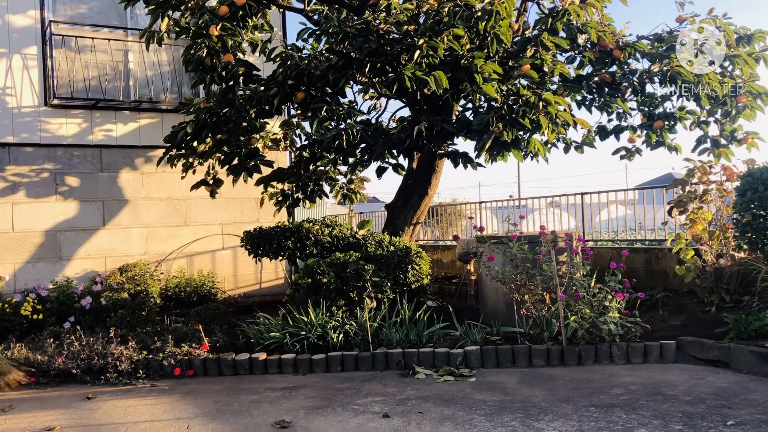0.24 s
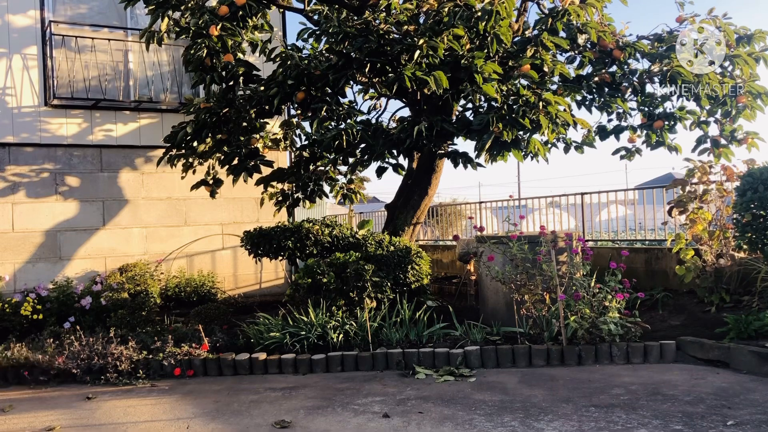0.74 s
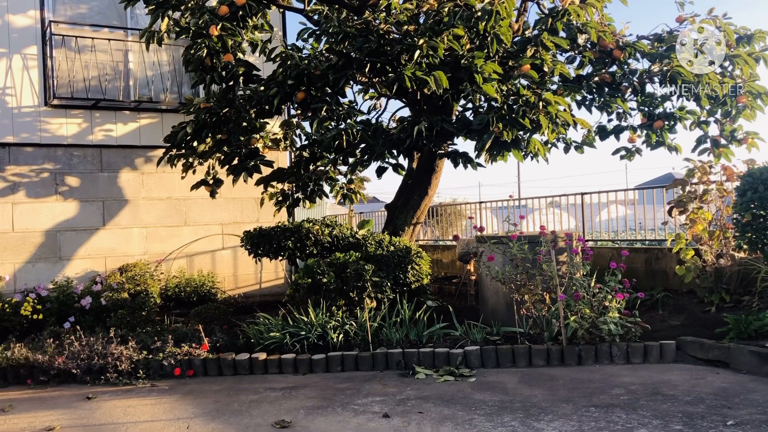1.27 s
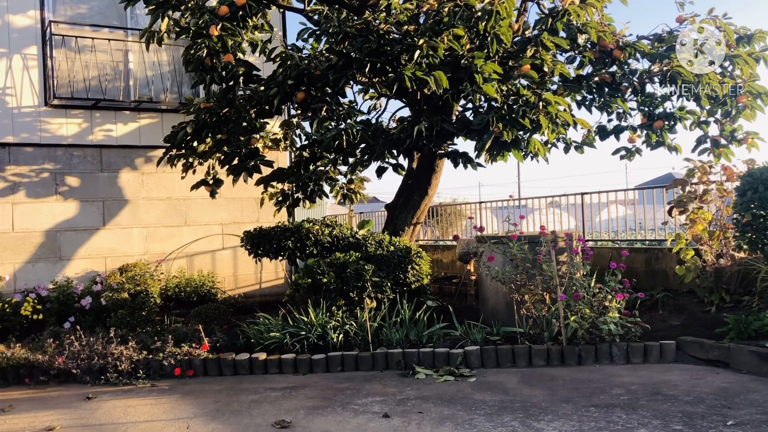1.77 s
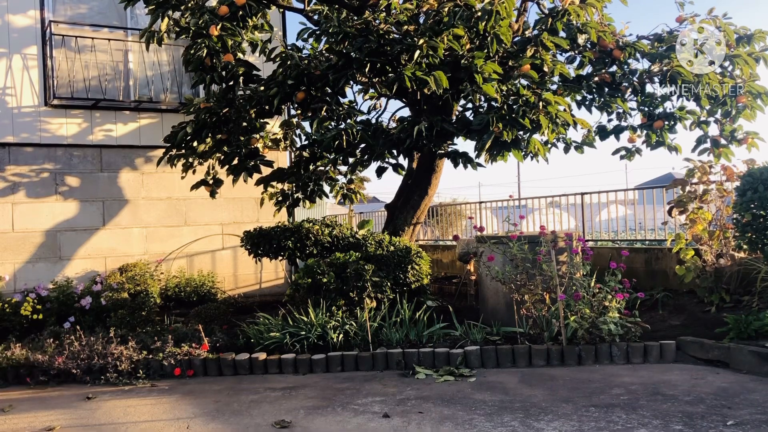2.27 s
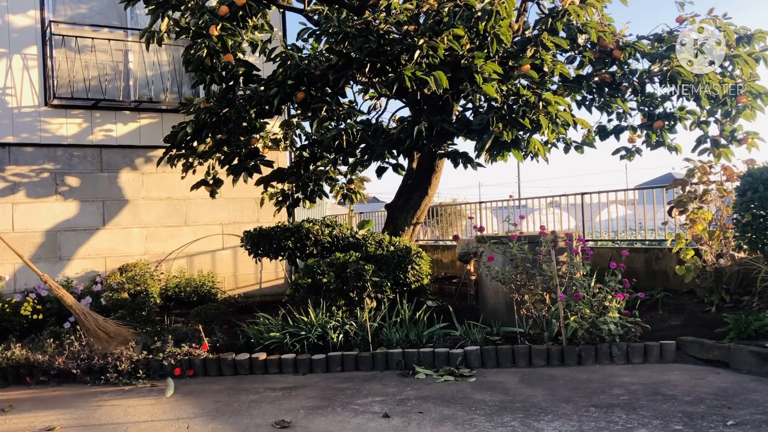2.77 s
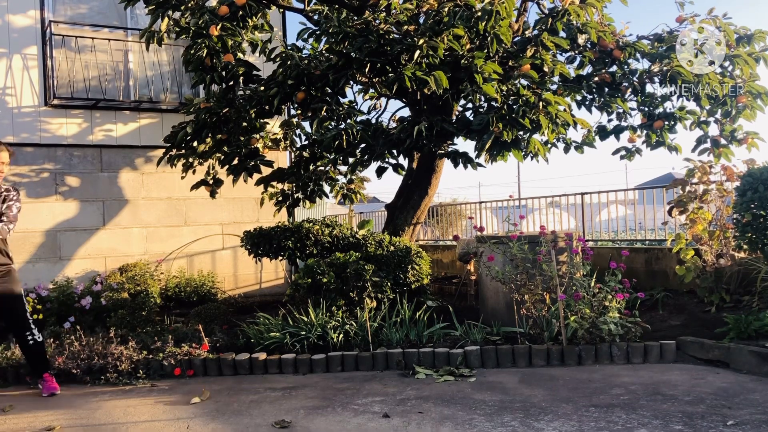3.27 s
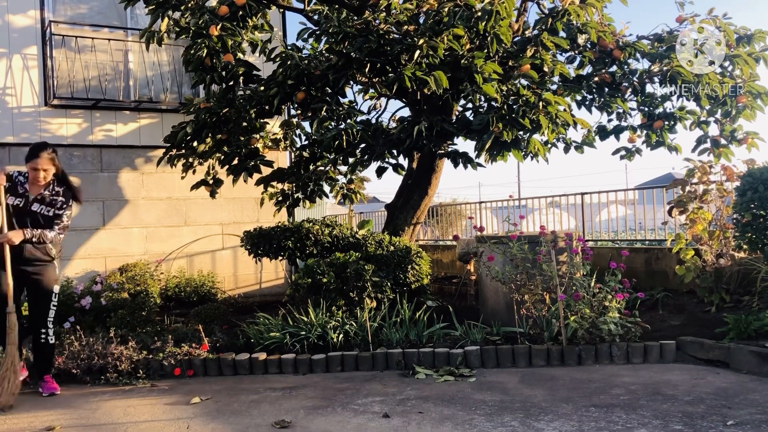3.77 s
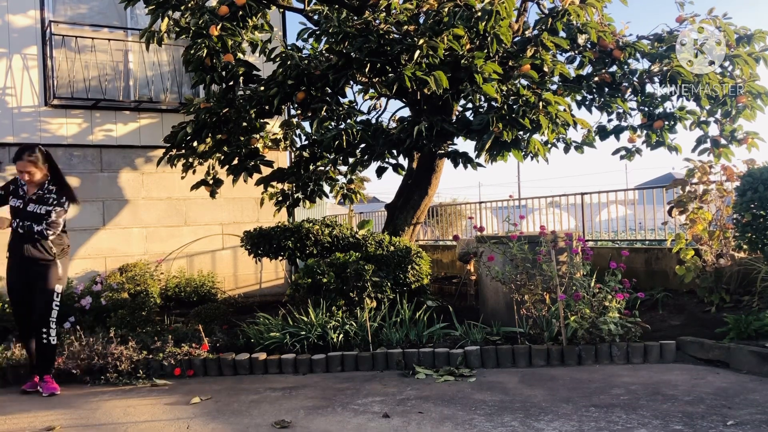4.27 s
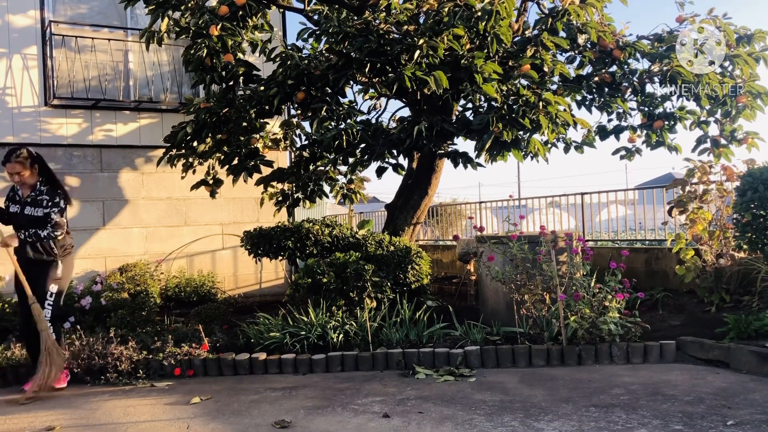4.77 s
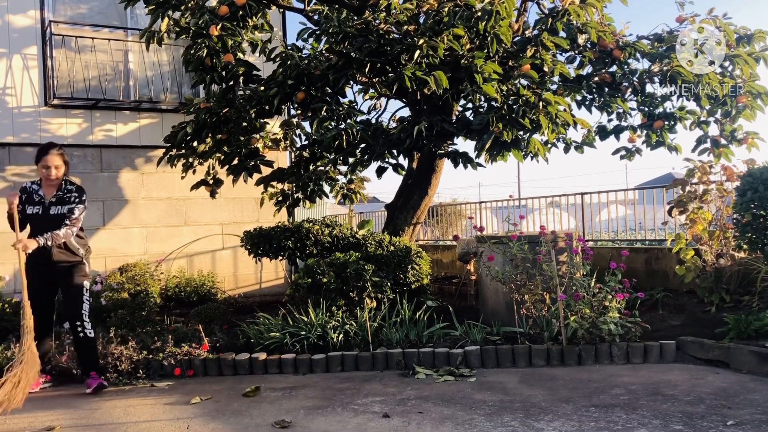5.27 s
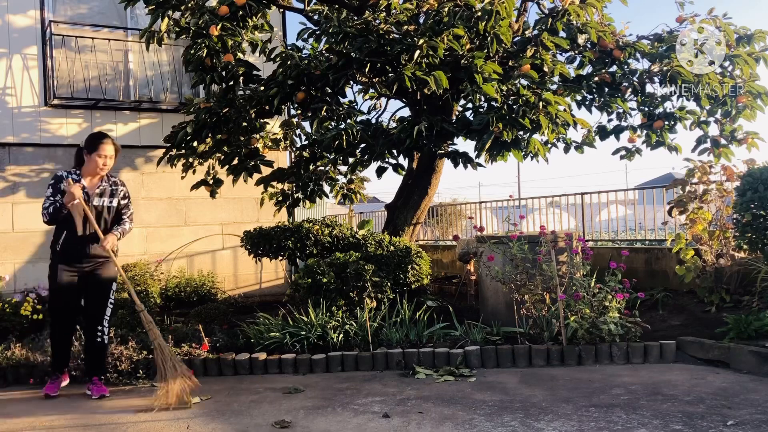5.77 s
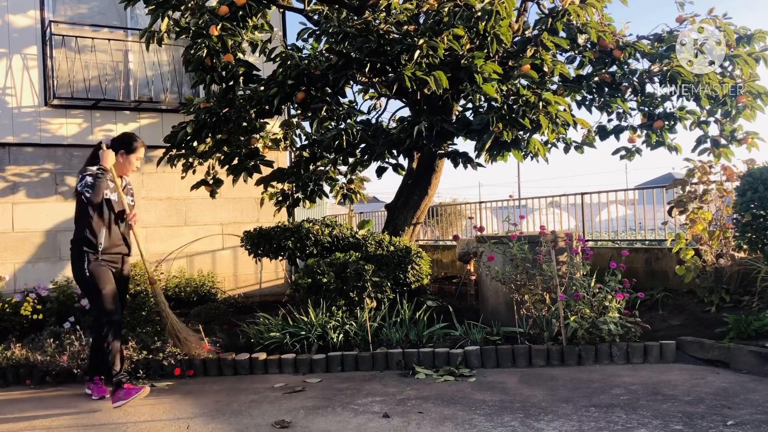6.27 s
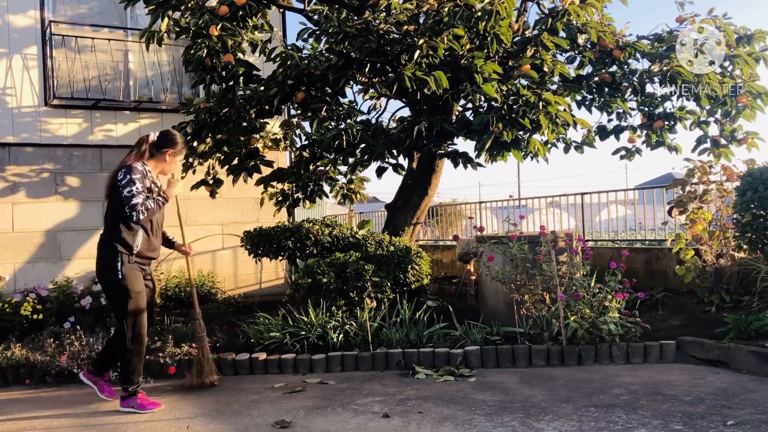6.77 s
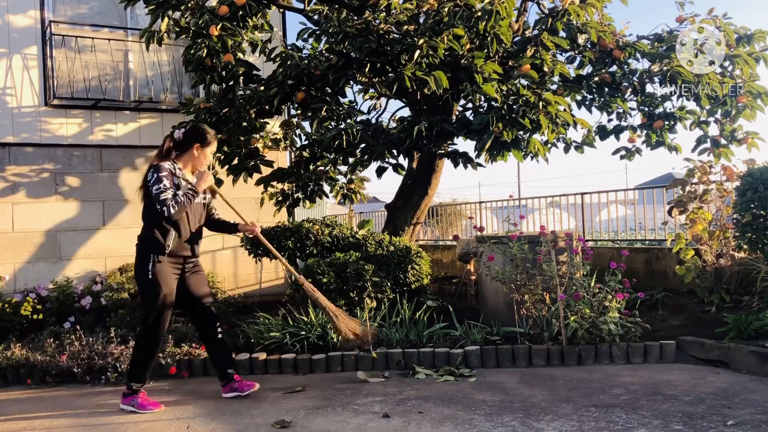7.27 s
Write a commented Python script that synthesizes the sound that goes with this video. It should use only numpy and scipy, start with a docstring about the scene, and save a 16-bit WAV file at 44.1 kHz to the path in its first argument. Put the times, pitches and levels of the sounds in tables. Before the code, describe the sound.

A twig broom sweeps a concrete patio in unhurried, bright hissing strokes, with gritty scuffs and skittering litter over low distant engine hum.

```python
"""A twig-broom stroke at its loudest opens the scene, the first of seven easy strokes on a concrete patio.
Stick-slip impulses make the broom's hiss, scrape and rasp; resonances add the ring of tips, twigs and stalks.
Shoes scuff with bursts of grains, litter skitters in ticks, stalks snap and the slab knocks as decaying modes.
A far bird calls in gliding sines over coloured noise, a drone and a wavering engine hum.
Echoes are a short noise scatter. The mono mix goes to two equal channels."""
import sys
import numpy as np
from scipy import signal
from scipy.fft import rfft, irfft
from scipy.io import wavfile

SR = 44100
rng = np.random.default_rng(int(sys.argv[2]) if len(sys.argv) > 2 else 0)


def generate_wav(sig):
    """Save sig (samples, or channels by samples) to the path in sys.argv[1] as 16-bit PCM at SR."""
    pcm = np.round(np.clip(np.atleast_2d(sig).T, -1, 1) * 32767).astype(np.int16)
    wavfile.write(sys.argv[1], SR, pcm)


N = 332073  # samples

# Pushes of the arms, one to three to a stroke. Each row: landing in seconds, swell in seconds, ease in seconds,
# landing level in dB below the peak, peak hiss of the tips in dB, scrape of the twigs in dB re hiss,
# rasp of the stalks in dB re hiss, tip ring in dB re hiss (before its drop at light pressure),
# loaded-twig ring in dB re hiss, mean twig-ring pitch in Hz, mean tip-ring pitch in Hz.
ARM_PUSHES = [(-0.2, 0.23, 0.14, 31, -24, -10, -17.5, -4, -27.5, 4800, 11300),
              (0.872, 0.115, 0.044, 18.5, -29, -14, -33, -4.5, -27.5, 3870, 10400),
              (0.92, 0.13, 0.091, 20, -31, -10, -12, -4, -9.5, 4300, 10700),
              (1.05, 0.21, 0.09, 24, -25.5, -10, -16, -4.5, -20.5, 4520, 11700),
              (2.092, 0.076, 0.045, 25, -32, -18, -32, -2.5, -28, 3957, 11050),
              (2.125, 0.18, 0.065, 25.5, -28, -6, -13, -6, -11.5, 3306, 11300),
              (2.212, 0.24, 0.097, 36.5, -22.5, -10, -20, -7, -30, 4980, 11400),
              (3.2, 0.15, 0.15, 15, -38, -5.5, -12, -4.5, -8.5, 4100, 10940),
              (3.499, 0.32, 0.055, 25.5, -27, -7.5, -17.5, -10.5, -19, 4900, 11670),
              (4.527, 0.22, 0.062, 22.5, -23.5, -8, -16.5, -9, -18.5, 2670, 11700),
              (5.287, 0.26, 0.28, 36, -24.5, -7.5, -15.5, -10.5, -24.5, 5130, 11750),
              (6.519, 0.11, 0.13, 19.5, -25, -9, -18.5, -26, -20.5, 3324, 11600),
              (6.6, 0.23, 0.12, 29.5, -23, -9, -18.5, -27, -17.5, 3400, 11600),
              (6.915, 0.087, 0.063, 32, -28, -7, -15, -26.5, -30, 5250, 11600)]
# Spectrum of the tips' hiss. Each row: frequency in Hz, relative density in dB per Hz.
TIP_SPECTRUM = [(5000, -20), (7000, -12.5), (8300, -7.5), (10000, -1.5), (12000, -2.5), (13200, 0.5),
                (15500, 2)]
# Spectrum of the twigs' scrape. Each row: frequency in Hz, relative density in dB per Hz.
TWIG_SPECTRUM = [(2000, -4), (3500, -2), (5000, 5), (7500, 0), (9500, -11.5)]
# Spectrum of the stalks' rasp. Each row: frequency in Hz, relative density in dB per Hz.
STALK_SPECTRUM = [(200, -22), (400, -6), (800, -5), (1400, -2.5), (4500, 0)]
# Thick stalks catch and spring free. Each row: time in seconds, level in dB, pitch as a multiple of the modes.
STALK_SNAPS = [(3.346, -38.5, .68), (3.776, -32.5, 1.05), (3.787, -34, .66), (4.663, -26.5, 1.15),
               (4.669, -25, 1.08), (4.751, -25, 1.075), (4.805, -28.5, 1.1), (5.987, -38.5, 1.08)]
# Modes of a stalk. Each row: frequency in Hz at pitch 1, level in dB re snap, T60 in seconds.
STALK_BODY_MODES = [(775, -12, 0.02), (1076, 2, 0.0031), (2020, 6, 0.0077), (2380, -3.5, 0.043),
                    (2420, -21, 0.58), (2800, -3.5, 0.028), (3830, 4.5, 0.012), (4900, -3, 0.012)]
# Shoe scuffs and light broom touches. Each row: start in seconds, level in dB before the band gains,
# treble in dB re middle before the band gains, T60 in seconds.
SCUFF_BURSTS = [(0.41, -34.5, 4, 0.015), (0.584, -42.5, 4, 0.14), (0.595, -38, 0, 0.12),
                (2.744, -33, 3, 0.1), (3.081, -43.5, -3, 0.19), (3.138, -41.5, 9, 0.059),
                (3.158, -47, 8, 0.096), (4.135, -34, -11, 0.038), (4.286, -46.5, -15, 0.13),
                (5.153, -40.5, 2, 0.17), (5.957, -34.5, -28, 0.094), (5.985, -29.5, -5.5, 0.052),
                (6.098, -26.5, -1, 0.045), (6.118, -37, -3, 0.15), (6.332, -34, -3, 0.13),
                (6.433, -39.5, -15, 0.11), (7.205, -38, -10, 0.083), (7.246, -38.5, -3, 0.15),
                (7.344, -42, -16, 0.026), (7.393, -37, -13, 0.019)]
# Litter and grit on the move. Each row: start in seconds, length in seconds, peak level in dB,
# treble in dB re middle.
LITTER_RUNS = [(0.405, 0.15, -61, -0.5), (0.803, 0.11, -54.5, 4), (1.648, 0.39, -71, 8.5),
               (4.039, 0.52, -61.5, -21), (5.208, 0.093, -53, -11), (5.93, 1, -58.5, -16),
               (6.322, 0.3, -62, 6.5), (7.053, 0.5, -48, -10)]
# Spectrum of the litter's middle. Each row: frequency in Hz, relative density in dB per Hz.
LITTER_SPECTRUM = [(1200, 3), (3300, 5.5), (5500, 1), (7000, -4.5), (9500, -13.5)]
# Dull blows of shoes and broom head on the slab. Each row: time in seconds, level in dB,
# pitch as a multiple of the modes.
SLAB_KNOCKS = [(.2528, -31.5, 1), (.276, -36.5, .48), (1.594, -41, .72), (1.606, -39, .55),
               (3.778, -38.5, .9), (7.345, -41, 1.05)]
# Modes of the knocks. Each row: frequency in Hz at pitch 1, level in dB re knock, T60 in seconds.
SLAB_MODES = [(220, 0, 0.035), (512, 1, 0.026), (880, 4.5, 0.02), (1380, 9, 0.0064)]
# Bird notes. Each row: start in seconds, length in seconds, first pitch in Hz, last pitch in Hz,
# mid-note arch in Hz, level in dB before flutter and echo.
BIRD_NOTES = [(0.355, .135, 3950, 4560, 0, -61.5), (0.645, 0.09, 3660, 3620, 150, -68),
              (4.365, 0.09, 3850, 3850, 350, -66)]
# Spectrum of the neighbourhood's rumble. Each row: frequency in Hz, relative density in dB per Hz.
AIR_SPECTRUM = [(28, -40), (38, -13.5), (48, 3.5), (68, -0.5), (95, 3.5), (200, -2.5), (400, -8.5),
                (900, -10), (1400, -14), (2200, -26), (4000, -30.5), (7000, -37.5), (15000, -40)]
# Far engine. Each row: time in seconds, firing note in dB rms before its swell, octave in dB rms before its swell.
ENGINE_LEVELS = [(0, -58.5, -71), (.9, -66, -55), (1.5, -61.5, -67), (5.2, -58.5, -69.5), (6.7, -52, -63.5),
                 (7.5, -55.5, -87)]

CONTROL_STEP_S = 0.002
EASE_DB = 6.5  # drop below the peak at lift-off
LAND_DB_PER_S, LIFT_DB_PER_S = 1485.5, 338
SETTLE_DB = -16.5  # level re peak from which the lifted bundle's rustle decays
TIPS_SETTLE_DB_PER_S, TWIGS_SETTLE_DB_PER_S = 102, 71.5
# floors: faint rustle and ring of the carried broom
CARRY_HISS_DB, CARRY_SCRAPE_DB, CARRY_RASP_DB, CARRY_RING_DB = -80, -82, -70, -85
SCRAPE_FOLLOW, RASP_FOLLOW, TWIG_RING_FOLLOW = 0.8, 0.67, 0.96  # share of the push's swing in dB
TIP_SWELL_DB, TWIG_SWELL_DB, STALK_SWELL_DB, SWELL_CORNER_HZ = 3, 5, 3, 3.6
RING_WANDER, RING_WANDER_CORNER_HZ = 0.025, 3  # fraction of pitch
TIP_WIDTH_HZ, TWIG_WIDTH_HZ = 1270, 880
CRACKS_PER_S, CRACK_DB = 28, -36  # tips flick hard off pebbles; level re tip sound
SCUFF_ATTACK_S, SCUFF_SCRAPS_DB = 0.00096, -6.5  # ringing scraps re grit
SCRAP_TICKS_PER_S, SCRAP_T60_S = 1500, 0.009
SAND_GRAINS_PER_S, SAND_SPREAD_DB, SKITTER_SAND_DB = 1500, 6, -0.5  # sand re scraps
BIRD_WAVER = 0.008  # fraction of pitch
AIR_DB = -48.5  # rms
HUM_HZ, HUM_WAVER, HUM_SWELL_DB = 144.5, 0.014, 2.8  # waver as a fraction of pitch
DRONE_HZ, DRONE_DB, DRONE_T60_S = 66.3, -56.5, 0.87  # dB rms
CUTOFF_HZ = 15850


def broom():
    """Tips hiss, twigs scrape, stalks rasp; a harder stroke brings more twigs into contact."""
    hiss_db, scrape_db, rasp_db, tip_db, twig_db, twig_hz, tip_hz = sweep()
    pressure = np.clip(from_db(hiss_db + 33), 0, 1)
    lightness = 1 - np.sqrt(pressure)
    slips_per_s = 1500 + 22000 * pressure
    contacts = slips(slips_per_s, spread_db=3)

    tips = coloured(contacts, TIP_SPECTRUM)
    tip_rings = twig_rings(slips_per_s, 7200, 15500, t60_s=0.0056, swell_db=TIP_SWELL_DB, count=20)
    tips = blend(tips, tip_rings, -8)
    tips = blend(tips, moving_ring(tip_hz, TIP_WIDTH_HZ), tip_db - 7 * lightness ** 2)
    cracks = rms_one(band(slips(CRACKS_PER_S, spread_db=20), 3000, 15000))
    tips = blend(tips, cracks, CRACK_DB)

    twigs = coloured(slips(slips_per_s, spread_db=5), TWIG_SPECTRUM)
    single_twigs = twig_rings(slips_per_s, 3100, 6600, t60_s=0.028, swell_db=TWIG_SWELL_DB, count=10)
    twigs = blend(twigs, single_twigs, -8.5)
    # barely touching, single grains of grit crackle
    crackle = rms_one(band(slips(240, spread_db=4.5), 2400, 5300))
    twigs = blend(twigs, crackle, -17 + 14 * lightness ** 2)
    loaded = moving_ring(twig_hz, TWIG_WIDTH_HZ)

    stalks = coloured(contacts, STALK_SPECTRUM)
    stalk_rings = twig_rings(slips_per_s, 1500, 2800, t60_s=0.016, swell_db=STALK_SWELL_DB, count=8)
    stalks = blend(stalks, stalk_rings, -8)

    # pressed down, the head runs evenly; barely touching, it stutters
    judder_db = (0.8 + 2 * lightness ** 2) * np.clip(drift(32), -2, 2)
    head = tips + from_db(scrape_db) * twigs + from_db(twig_db) * loaded + from_db(rasp_db) * stalks
    return from_db(judder_db) * from_db(hiss_db) * head


def sweep():
    """Pushes add in power: hiss in dB; scrape, rasp, tip and twig ring in dB re hiss; two ring pitches in Hz."""
    t = np.arange(0, N / SR, CONTROL_STEP_S)
    columns = np.transpose(ARM_PUSHES)[:, :, None]
    start_s, swell_s, ease_s, landing_db, db, scrape_db, rasp_db, tip_db, twig_db, twig_hz, tip_hz = columns
    on_tips = push(t - start_s, swell_s, ease_s, landing_db, TIPS_SETTLE_DB_PER_S)
    on_twigs = push(t - start_s, swell_s, ease_s, landing_db, TWIGS_SETTLE_DB_PER_S)
    hiss = power_sum(db + on_tips, CARRY_HISS_DB)
    scrape = power_sum(db + scrape_db + SCRAPE_FOLLOW * on_tips, CARRY_SCRAPE_DB)
    rasp = power_sum(db + rasp_db + RASP_FOLLOW * on_twigs, CARRY_RASP_DB)
    tip_ring = power_sum(db + tip_db + on_tips, CARRY_RING_DB)
    twig_ring = power_sum(db + twig_db + TWIG_RING_FOLLOW * on_twigs, CARRY_RING_DB)
    twig_pitch = shared_pitch(twig_hz, db + twig_db + on_twigs)
    tip_pitch = shared_pitch(tip_hz, db + tip_db + on_tips)
    relative = [scrape - hiss, rasp - hiss, tip_ring - hiss, twig_ring - hiss]
    return in_time(np.transpose([t, hiss, *relative, twig_pitch, tip_pitch]))


def push(t, swell_s, ease_s, landing_db, settle_db_per_s):
    """Level in dB re peak, t seconds after landing: the push swells, eases, lifts, and the bundle settles."""
    to_come = np.clip(1 - t / swell_s, 0, 1)
    eased = np.clip((t - swell_s) / ease_s, 0, 1)
    lifted_s = np.maximum(t - swell_s - ease_s, 0)
    release = np.maximum(-LIFT_DB_PER_S * lifted_s, SETTLE_DB - settle_db_per_s * lifted_s)
    landing = LAND_DB_PER_S * np.minimum(t, 0)
    return landing - landing_db * to_come ** 2 - EASE_DB * eased ** 2 + release


def shared_pitch(hz, levels_db):
    """Power-weighted mean pitch: it glides from push to push as the load passes over."""
    power = from_db(levels_db - levels_db.max(axis=0)) ** 2
    return np.sum(hz * power, axis=0) / np.sum(power, axis=0)


def twig_rings(per_s, low_hz, high_hz, t60_s, swell_db, count):
    """Single twigs touch down and lift off; each slip rings one, and its pitch wanders as it bends; rms 1."""
    clicks = slips(per_s, spread_db=0)
    dealt = rng.integers(0, count, N)
    decay = from_db(-60 / (t60_s * SR))
    out = np.zeros(N)
    for k, hz in enumerate(np.geomspace(low_hz, high_hz, count)):
        swing = signal.lfilter([1], [1, -decay], clicks * (dealt == k) + 1e-18)
        wander = 2 * RING_WANDER * drift(RING_WANDER_CORNER_HZ / 2)
        phase = 2 * np.pi * np.cumsum(hz * (1 + wander)) / SR
        swell = from_db(swell_db * np.clip(drift(SWELL_CORNER_HZ), -2, 2))
        out += swing * np.sin(phase) * swell
    return rms_one(band(out, low_hz / np.sqrt(2), high_hz * np.sqrt(2)))


def moving_ring(hz, width_hz):
    """A rubbed resonance: a narrow random band that glides, and wanders as load shifts between twigs; rms 1."""
    lowpass = signal.butter(2, width_hz / 2, fs=SR, output="sos")
    slow = signal.sosfilt(lowpass, rng.standard_normal((2, N)))
    phase = 2 * np.pi * np.cumsum(hz * (1 + RING_WANDER * drift(RING_WANDER_CORNER_HZ))) / SR
    return rms_one(slow[0] * np.cos(phase) + slow[1] * np.sin(phase))


def stalk_snaps():
    """Thick stalks catch and spring free, each ringing its modes at its own pitch."""
    return struck(STALK_SNAPS, STALK_BODY_MODES)


def scuffs():
    """Grit crunches under a sole or twig: fast-dying grains and ringing scraps, over a soft pat."""
    middle, treble = np.zeros(N), np.zeros(N)
    for s, db, treble_db, t60_s in SCUFF_BURSTS:
        at = round(s * SR)
        t = np.arange(N - at) / SR
        attack = np.minimum(t / SCUFF_ATTACK_S, 1)
        fade = attack * from_db(db - np.minimum(60 * t / t60_s, 200))
        middle[at:] += fade
        treble[at:] += fade * from_db(treble_db)
    grit = blend(slips(9000, spread_db=5), scraps(1900, 5980, count=14), SCUFF_SCRAPS_DB)
    sand = slips(9900, spread_db=6)
    crunch = band(grit * middle, 1500, 6360)
    pat = band(sand * middle, 340, 1960)
    highpass = signal.butter(2, 7000, "high", fs=SR, output="sos")
    fizz = signal.sosfilt(highpass, sand * treble + 1e-18)
    return from_db(-1) * crunch + from_db(-2) * pat + from_db(-8) * fizz


def skitters():
    """Litter tumbles and comes to rest: each scrap ticks at its own pitch, over sliding sand."""
    t = np.arange(N) / SR
    middle, treble = np.zeros(N), np.zeros(N)
    for s, length_s, db, treble_db in LITTER_RUNS:
        part = np.clip((t - s) / length_s, 0, 1)
        motion = from_db(db) * np.sin(np.pi * np.sqrt(part))
        middle += motion
        treble += motion * from_db(treble_db)
    sand = slips(SAND_GRAINS_PER_S, spread_db=SAND_SPREAD_DB)
    grains = blend(scraps(1212, 15460, count=26), sand, SKITTER_SAND_DB)
    grains = grains * from_db(2 * np.clip(drift(47), -2, 2))
    ticks = slips(SAND_GRAINS_PER_S / 2, spread_db=SAND_SPREAD_DB)
    fizz = rms_one(band(grains / 2 + ticks, 7500, 21000))
    return middle * coloured(grains, LITTER_SPECTRUM) + treble * fizz


def scraps(low_hz, high_hz, count):
    """Random ticks dealt to short resonances, with even power per Hz; rms 1."""
    clicks = slips(SCRAP_TICKS_PER_S, spread_db=0.5)
    dealt = rng.integers(0, count, N)
    out = np.zeros(N)
    for k, hz in enumerate(np.geomspace(low_hz, high_hz, count)):
        out += np.sqrt(hz) * ring(clicks * (dealt == k), hz, SCRAP_T60_S)
    return rms_one(out)


def knocks():
    """Shoes and broom head hit the slab; each blow rings short low modes."""
    return struck(SLAB_KNOCKS, SLAB_MODES)


def bird():
    """Thin gliding notes, unsteady and smeared by the echoes of distance."""
    t = np.arange(N) / SR
    waver = 1 + BIRD_WAVER * drift(154)
    out = np.zeros(N)
    for s, length_s, first_hz, last_hz, arch_hz, db in BIRD_NOTES:
        part = np.clip((t - s) / length_s, 0, 1)
        arch = np.sin(np.pi * part)
        hz = (first_hz + (last_hz - first_hz) * part + arch_hz * arch) * waver
        out += from_db(db) * arch * np.sin(2 * np.pi * np.cumsum(hz) / SR)
    flutter = from_db(drift(40))
    return garden(out * flutter, tail_db=-3, t60_s=0.25)


def neighbourhood():
    """Far traffic as coloured noise, a noise-driven low resonance and a wavering engine note with its octave."""
    note_db, octave_db = in_time(ENGINE_LEVELS)
    phase = 2 * np.pi * np.cumsum(HUM_HZ * (1 + HUM_WAVER * drift(6.4))) / SR
    note = from_db(note_db) * np.sin(phase)
    octave = from_db(octave_db) * np.sin(2 * phase + drift(20))
    swell = from_db(HUM_SWELL_DB * np.clip(drift(5.6), -2, 2))
    hum = np.sqrt(2) * (note + octave) * swell
    drone = from_db(DRONE_DB) * rms_one(ring(rng.standard_normal(N), DRONE_HZ, DRONE_T60_S))
    air = from_db(AIR_DB) * coloured(rng.standard_normal(N), AIR_SPECTRUM)
    return air + hum + drone


def garden(x, tail_db, t60_s):
    """Walls, plants and fences return a weak, short scatter: decaying band-passed noise."""
    t = np.arange(SR // 2) / SR
    scatter = band(rng.standard_normal(len(t)), 273, 12000) * from_db(-60 * t / t60_s)
    return x + from_db(tail_db) * signal.fftconvolve(x, scatter / np.linalg.norm(scatter))[:N]


def slips(per_s, spread_db):
    """Random tiny impacts of uneven size; their mean power does not depend on their rate."""
    chance = np.clip(per_s / SR, 1e-4, 1)
    sizes = from_db(spread_db * np.clip(rng.standard_normal(N), -2, 2)) * rng.choice([-1, 1], N)
    return rms_one((rng.random(N) < chance) * sizes / np.sqrt(chance))


def struck(blows, modes):
    """Each blow rings all the modes of a body, scaled to its own pitch."""
    t = np.arange(SR // 2) / SR
    out = np.zeros(N + len(t))
    for s, db, pitch in blows:
        at = round(s * SR)
        for k, (hz, mode_db, t60_s) in enumerate(modes):
            decay = from_db(db + mode_db - 60 * t / t60_s)
            out[at:at + len(t)] += (-1) ** k * decay * np.sin(2 * np.pi * hz * pitch * t)
    return out[:N]


def ring(clicks, hz, t60_s):
    """Two-pole resonance: a unit click sets a sine of height 1 ringing."""
    r, w = from_db(-60 / (t60_s * SR)), 2 * np.pi * hz / SR
    return signal.lfilter([0, np.sin(w)], [1, -2 * r * np.cos(w), r * r], clicks + 1e-18)


def coloured(x, spectrum):
    """Give a steady signal a spectrum, falling 20 dB per octave beyond its ends; rms 1."""
    hz, db = np.transpose(spectrum)
    octave = np.log2(np.maximum(np.arange(N // 2 + 1) * SR / N, 1))
    beyond = np.abs(octave - np.clip(octave, np.log2(hz[0]), np.log2(hz[-1])))
    gain_db = np.interp(octave, np.log2(hz), db) - 20 * beyond
    return rms_one(irfft(rfft(x) * from_db(gain_db), N))


def drift(corner_hz):
    """Slow chance of rms 1: noise at SR / 40 through two equal poles, then interpolated."""
    r = np.exp(-2 * np.pi * corner_hz * 40 / SR)
    noise = rng.standard_normal(N // 40 + 2002)
    slow = signal.lfilter([1], [1, -2 * r, r * r], noise)[2000:]  # skip the run-in
    return np.interp(np.arange(N) / 40, np.arange(len(slow)), rms_one(slow))


def band(x, low_hz, high_hz):
    """Gentle band-pass."""
    edges_hz = [low_hz, min(high_hz, SR / 2 - 1000)]
    return signal.sosfilt(signal.butter(2, edges_hz, "band", fs=SR, output="sos"), x + 1e-18)


def blend(x, other, other_db):
    """Mix two unrelated sounds at constant power."""
    return (x + from_db(other_db) * other) / np.sqrt(1 + from_db(other_db) ** 2)


def power_sum(levels_db, floor_db):
    """Level in dB of unrelated sounds together, over a floor."""
    return 10 * np.log10(np.sum(from_db(levels_db) ** 2, axis=0) + from_db(floor_db) ** 2)


def in_time(rows):
    """Each column of a curve, sample by sample."""
    s, *columns = np.transpose(rows)
    return [np.interp(np.arange(N) / SR, s, c) for c in columns]


def from_db(db):
    """Decibels to gain."""
    return 10 ** (np.asarray(db) / 20)


def rms_one(x):
    """Scale to rms 1."""
    return x / np.sqrt(np.mean(x ** 2) + 1e-20)


def scene():
    """Broom, scuffs, litter, snaps and bird share the garden's echoes; knocks and neighbourhood stay dry."""
    patio = broom() + stalk_snaps() + scuffs() + skitters() + bird()
    mono = garden(patio, tail_db=-13.5, t60_s=0.16) + knocks() + neighbourhood()
    return np.array([mono, mono])


def record(dry):
    """A steep elliptic low-pass cuts the top."""
    return signal.sosfilt(signal.ellip(12, 0.1, 80, CUTOFF_HZ, fs=SR, output="sos"), dry)


dry = scene()
out = record(dry)
generate_wav(out)
```